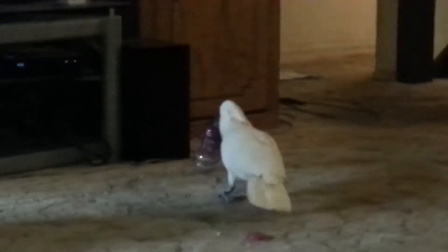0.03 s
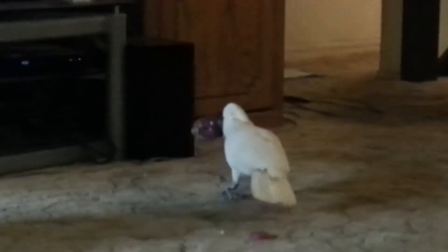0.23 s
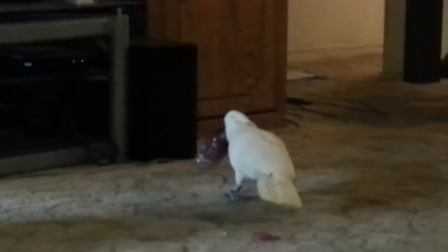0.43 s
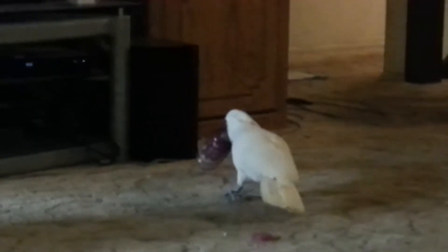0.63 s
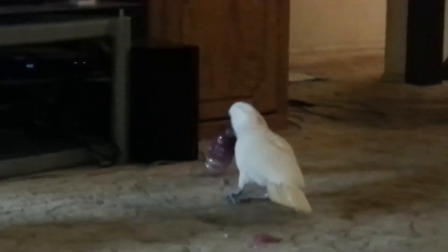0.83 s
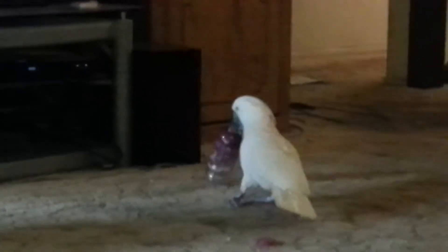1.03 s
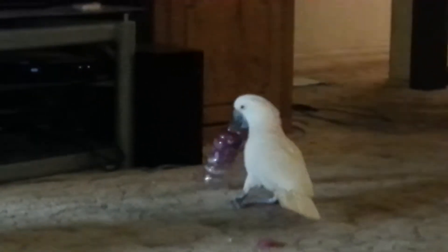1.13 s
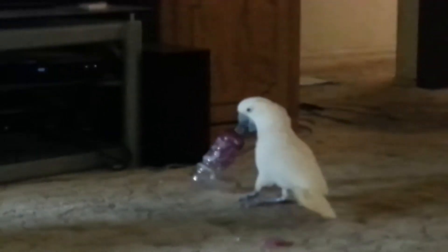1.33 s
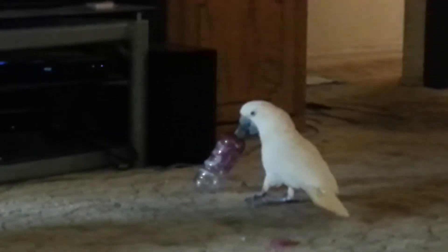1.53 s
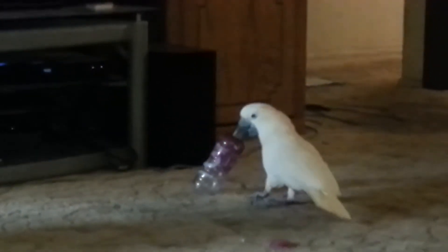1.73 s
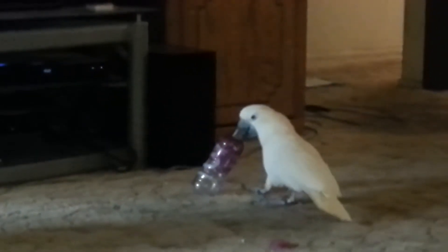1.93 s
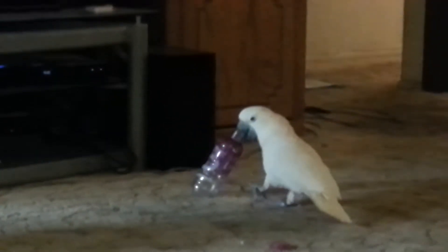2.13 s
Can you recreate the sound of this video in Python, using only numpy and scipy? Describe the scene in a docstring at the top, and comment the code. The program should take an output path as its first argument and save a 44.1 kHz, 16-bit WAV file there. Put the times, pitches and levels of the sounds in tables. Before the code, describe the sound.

Thin plastic bottle snapping and bumping hollowly on a carpeted floor, then softly scraping along.

```python
"""An empty plastic bottle, held in a cockatoo's beak a few metres away in a quiet carpeted room.
Its thin wall buckles with bright snaps, then it is knocked twice on the floor: a carpet thud, a clack
and a hollow ring from the wall and the air inside. It is dragged, rustling in tiny slips and
squeaking faintly, and tapped once more. A bed of mains hum and hiss lies underneath."""
import sys
import numpy as np
from scipy import signal
from scipy.fft import rfft, irfft, next_fast_len
from scipy.io import wavfile
from scipy.ndimage import uniform_filter1d, map_coordinates

SR = 44100
rng = np.random.default_rng(int(sys.argv[2]) if len(sys.argv) > 2 else 0)


def dump(signal):
    """Clip the signal to [-1, 1] and save it as 16-bit WAV at the path in sys.argv[1]."""
    limited = np.clip(np.atleast_2d(signal).T, -1, 1)
    pcm = np.round(limited * 32767).astype(np.int16)
    wavfile.write(sys.argv[1], SR, pcm)


N = 97020

# mains hum partials: (frequency [Hz], level [dB])
HUM_PARTIALS = [(59.8, -80), (120, -88.5), (179, -79), (240, -81.5), (539, -86.5), (720, -86.5),
                (1190, -90)]
# tone of the hiss: (frequency [Hz], gain [dB])
HISS_EQ = [(25, -14), (45, -11), (63, -14), (85, -4.5), (130, -1), (250, 0.5), (400, -9.5), (520, -1),
           (600, -13), (720, 2.5), (1000, -12.5), (1200, -8), (3100, -13.5), (7200, -14), (14500, -20.5)]
# stereo width of hiss and reverb: (frequency [Hz], left-right correlation [0-1])
STEREO_CORRELATION = [(60, 0.42), (250, 0.54), (600, 0.58), (1200, 0.083), (4000, 0.024)]
# reverb decay: (frequency [Hz], T60 [s])
REVERB_DECAY = [(200, 0.31), (1000, 0.21), (3000, 0.17), (7000, 0.18), (14000, 0.092)]
# pan of the direct sound: (frequency [Hz], left over right [dB])
DIRECT_PAN = [(250, 2), (800, 5), (1500, 6.5), (2500, 1), (5000, 11), (8500, -10), (13000, 2.5)]

# fader rides for the drag's scrape and its treble crinkle: (time [s], level [dB])
SCRAPE_ENVELOPE = [(0, -73), (.1, -70), (.17, -71.5), (.215, -58.5), (.26, -57.5), (.38, -72.5), (.52, -64),
                   (.59, -71.5), (.7, -76.5), (.8, -73), (.84, -70), (.91, -64.5), (.945, -60),
                   (1.02, -70.5), (1.06, -63), (1.14, -78.5), (1.24, -62), (1.32, -76), (1.37, -70.5),
                   (1.45, -81), (1.67, -71), (1.8, -76.5), (2.2, -75.5)]
CRINKLE_ENVELOPE = [(0, -78), (.1, -70), (.18, -76), (.22, -54.5), (.27, -58.5), (.38, -71.5), (.72, -79),
                    (.77, -63), (.8, -72), (.885, -65), (.905, -63.5), (.985, -62), (1.034, -82),
                    (1.042, -53), (1.062, -58.5), (1.1, -84), (1.16, -70), (1.18, -64.5), (1.25, -77.5),
                    (1.75, -77), (1.78, -72), (1.83, -80), (2.2, -78)]
# tone of the scrape and the crinkle: (frequency [Hz], gain [dB])
SCRAPE_EQ = [(100, -7), (250, 2), (480, -6), (900, -4), (1250, 0.5), (1550, -9.5), (2100, -3.5),
             (3200, -18), (8000, -22)]
CRINKLE_EQ = [(800, -59), (3300, -9), (4900, -3), (6000, -2), (7700, -1.5), (9500, -9.5), (14500, -7.5)]
# brief rubs: (midpoint [s], length [s], band centre [Hz], level [dB])
SCUFF_CUES = [(0.105, 0.059, 2980, -73), (0.979, 0.04, 473, -71.5), (0.987, 0.034, 7000, -61),
              (1.055, 0.038, 485, -63), (1.047, 0.025, 7600, -52.5), (1.183, 0.027, 1910, -58),
              (1.654, 0.1, 4100, -77.5), (1.78, 0.035, 7100, -73), (2.095, 0.027, 4320, -72.5)]
# faint squeaks: (time [s], length [s], start pitch [Hz], end pitch [Hz], level [dB],
# overtone slope [dB/octave], roughness [0-1])
SQUEAK_CUES = [(0.927, 0.067, 1161, 1294, -59, -15.5, 0.29), (1.231, 0.029, 1227, 1177, -59, -35, 0.33),
               (1.896, 0.018, 1296, 1314, -67, -15, 0.65), (2.053, 0.058, 357, 335, -62.5, -10, 0.21),
               (2.084, .022, 330, 313, -59.5, -7, 0.1)]

# snaps of the thin wall, the third row being an early echo of the first snap off a nearby surface: (time [s],
# level [dB], spectral peak [Hz], high cut [Hz])
SNAP_CUES = [(.2253, -28.5, 6530, 13900), (.2264, -28.5, 6730, 13200), (.2308, -30, 6250, 11900),
             (0.2792, -35.5, 7400, 9800), (0.4254, -29.5, 6840, 12400), (1.041, -54, 7500, 13900)]
# floor knocks: (time [s], air ring [dB], clack [dB], wall ring [dB], high cut [Hz], wall pitch [ratio])
KNOCK_CUES = [(0.281, -28, -29.5, -38.5, 9160, 1), (0.4263, -25, -30, -31, 11300, 1),
              (1.1787, -57.5, -46, -47.5, 2530, 0.98)]
# soft pushes into the carpet: (time [s], level [dB])
THUD_CUES = [(.270, -37.5), (.281, -30), (0.4274, -27), (1.169, -52.5)]
# tone of a snap and of a knock's clack: (frequency [Hz], gain [dB])
SNAP_EQ = [(200, -43), (1000, -29), (2200, -13), (3300, -31), (4500, -11.5), (5300, -11), (6500, 0),
           (8000, -5.5), (9800, -14.5), (14500, -21)]
CLACK_EQ = [(120, -4), (400, -0.5), (1000, -6.5), (1500, -2), (2100, 1.5), (3000, 0), (3900, -7),
            (4700, -6.5), (6600, -6.5), (8500, -14), (11000, -16), (14500, -4)]
# resonances of the air inside, the wall, the carpet thud and the ring after a snap:
# (frequency [Hz], level [dB], T60 [s], attack [s])
AIR_RING = [(255.7, 8, 0.15, 0.016), (538.5, -22.5, 0.18, 0.01)]
WALL_RING = [(812.3, -2, 0.096, 0.0023), (671, -7, .06, 0.0019), (1518, -17.5, 0.15, 0.0021),
             (1911, -12, 0.033, 0.00044), (2058, -12.5, 0.041, 0.00045), (2330, -12.5, 0.035, 0.00031)]
THUD_RING = [(195.8, -10, 0.15, 0.0046), (215.3, 1, 0.077, 0.0039), (318.6, -2.5, 0.071, .002)]
SNAP_RING = [(2160, -8, .07, 0.00078)]


def amp(db):
    """Decibels to gain."""
    return 10 ** (np.asarray(db) / 20)


def unit(x):
    """Normalise to rms 1."""
    return x / np.sqrt(np.mean(x ** 2) + 1e-20)


def along(points, hz):
    """Read a curve of (frequency [Hz], value) points on a log axis."""
    freqs, values = np.transpose(points)
    return np.interp(np.log(hz + 1), np.log(freqs + 1), values)


def clock(start=0):
    """Seconds since start, zero before it."""
    return np.maximum(np.arange(N) / SR - start, 0)


def wobble(rate):
    """A smooth random LFO with rate points a second."""
    return map_coordinates(rng.standard_normal(int(N * rate / SR) + 4), [clock() * rate])


def filtered(x, response):
    """Filter x by a complex frequency response."""
    n = x.shape[-1]
    padded = next_fast_len(n + 4096)
    return irfft(rfft(x, padded) * response(np.fft.rfftfreq(padded, 1 / SR)), padded)[..., :n]


def dulled(x, top_hz):
    """A steep high cut that sets how bright each snap or clack sounds."""
    return signal.sosfilt(signal.butter(6, min(top_hz, .45 * SR), fs=SR, output="sos"), x)


def add(track, start, sound):
    """Drop a one-shot onto the track at start seconds."""
    part = track[..., max(round(start * SR), 0):][..., :sound.shape[-1]]
    part += sound[..., :part.shape[-1]]


def burst(eq, t60, pitch=1, size=8192):
    """A noise transient, flattened and then shaped by an EQ curve; t60 is in seconds."""
    fade = 10 ** (-3 * np.arange(size) / SR / t60)
    noise = rfft(fade * rng.standard_normal(size))
    ripple = np.sqrt(np.abs(uniform_filter1d(np.abs(noise) ** 2, size=24)) + 1e-12)
    colour = amp(along(eq, np.fft.rfftfreq(size, 1 / SR) / pitch))
    # minimum phase keeps the attack sharp
    cepstrum = irfft(np.log(colour / ripple))
    cepstrum[1:size // 2] *= 2
    cepstrum[size // 2 + 1:] = 0
    hit = irfft(noise * np.exp(rfft(cepstrum)))
    return hit * np.linalg.norm(fade) / np.linalg.norm(hit)


def ring(modes):
    """Struck resonances: damped sines with a soft attack."""
    t = np.arange(SR // 2) / SR
    return sum(amp(db - 60 * t / t60) * (1 - np.exp(-t / attack)) ** 2 * np.sin(2 * np.pi * hz * t)
               for hz, db, t60, attack in modes)


def diffuse(pair):
    """Blend two unrelated noises into a field, narrower in the bass and wide on top."""
    def mid_side_gains(hz):
        angle = np.arccos(np.clip(along(STEREO_CORRELATION, hz), -1, 1)) / 2
        return np.array([np.cos(angle), np.sin(angle)])
    mid, side = filtered(pair, mid_side_gains)
    return np.array([mid + side, mid - side])


def in_room(x, wet_db, left_lag_s=.000035):
    """Direct sound, mostly louder left but a hair earlier right, plus a fresh short reverb tail."""
    x = np.pad(x, (0, SR // 4))
    hz, t, noise = signal.stft(rng.standard_normal((2, SR // 3)), SR, nperseg=256)
    decay = amp(-60 * t / along(REVERB_DECAY, hz)[:, None])
    tail = diffuse(signal.istft(noise * decay, SR, nperseg=256)[1])
    tail *= 1 - np.exp(-np.arange(tail.shape[1]) / SR / 0.0015)  # quick fade-in
    wet = signal.fftconvolve(x[None], tail / np.linalg.norm(tail[0]), axes=1)[:, :len(x)]
    sides = np.array([[.5], [-.5]])
    delay = sides * left_lag_s
    direct = filtered(x, lambda f: amp(sides * along(DIRECT_PAN, f)) * np.exp(-2j * np.pi * f * delay))
    return direct + amp(wet_db) * wet


def room_tone(hiss_db=-70, left_lead_s=.0002):
    """The bed: slightly unsteady mains hum from the left, over soft hiss."""
    t = clock() + left_lead_s * np.array([[1], [0]])
    hum = np.zeros((2, N))
    for hz, db in HUM_PARTIALS:
        level = amp(db) * np.sqrt(2) * (1 + 0.047 * wobble(4.4))
        hum += level * np.sin(2 * np.pi * hz * t + .2 * wobble(5.3))
    hiss = unit(filtered(diffuse(rng.standard_normal((2, N))), lambda hz: amp(along(HISS_EQ, hz))))
    return (hum + amp(hiss_db) * hiss) * amp([[.7], [-.7]])


def rustle(envelope, eq, slips_per_s=1500, flutter_db=3):
    """Dragged plastic moves in dense tiny slips: a granular texture under a fader ride."""
    slips = (rng.random(N) < slips_per_s / SR) * rng.standard_normal(N)
    slips *= amp(flutter_db * wobble(120))
    grains = unit(filtered(slips, lambda hz: amp(along(eq, hz))))
    return grains * amp(np.interp(clock(), *np.transpose(envelope)))


def scuffs(half_width_octaves=0.19):
    """Brief rubs of the bottle, each a band of noise that swells and fades."""
    out = np.zeros(N)
    for middle, length, hz, db in SCUFF_CUES:
        noise = rng.standard_normal(N)
        band = filtered(noise, lambda f: 1 / (1 + (np.log2((f + 1) / hz) / half_width_octaves) ** 2))
        swell = np.sin(np.pi * np.clip(clock(middle - length / 2) / length, 0, 1))
        out += amp(db) * unit(band) * swell
    return out


def squeaks():
    """The dragged bottle squeaks: short glides, roughened by jitter in pitch and level."""
    out = np.zeros(N)
    for start, length, start_hz, end_hz, db, slope_db, rough in SQUEAK_CUES:
        progress = np.clip(clock(start) / length, 0, 1)
        hz = (start_hz + (end_hz - start_hz) * progress) * (1 + 0.0588 * rough * wobble(400))
        phase = 2 * np.pi * np.cumsum(hz) / SR
        tone = sum(amp(slope_db * np.log2(k)) * np.sin(k * phase) for k in range(1, 7))
        swell = np.sqrt(np.abs(np.sin(np.pi * progress)))
        out += amp(db) * swell * tone * (1 + 0.69 * rough * wobble(200))
    return out


def snaps(eq_peak_hz=6500):
    """The thin wall buckles with short bright cracks that leave a brief ring."""
    out = np.zeros((2, N))
    for start, db, peak_hz, top_hz in SNAP_CUES:
        crack = dulled(burst(SNAP_EQ, t60=0.0089, pitch=peak_hz / eq_peak_hz), top_hz)
        add(out, start, amp(db) * in_room(crack, wet_db=-4.5))
        add(out, start, amp(db - 10.5) * in_room(ring(SNAP_RING), wet_db=-9.5))
    return out


def knocks():
    """The bottle hits the floor: ringing air and wall for body, clack for attack, thud for weight."""
    out = np.zeros((2, N))
    for start, air_db, clack_db, wall_db, top_hz, pitch in KNOCK_CUES:
        wall = ring([(hz * pitch, db, t60, attack) for hz, db, t60, attack in WALL_RING])
        add(out, start, amp(air_db) * in_room(ring(AIR_RING), wet_db=-23.5))
        add(out, start, amp(wall_db) * in_room(wall, wet_db=-9))
        clack = dulled(burst(CLACK_EQ, t60=0.0083), top_hz)
        add(out, start, amp(clack_db) * in_room(clack, wet_db=4.5))
    for start, db in THUD_CUES:
        add(out, start, amp(db) * in_room(ring(THUD_RING), wet_db=-14))
    return out


def scene():
    """The mix: knocks and snaps up front, the drag behind them, room tone underneath."""
    drag = rustle(SCRAPE_ENVELOPE, SCRAPE_EQ) + rustle(CRINKLE_ENVELOPE, CRINKLE_EQ) + scuffs()
    handling = in_room(amp(-3.5) * drag, wet_db=1) + in_room(squeaks(), wet_db=-9.5)
    return knocks() + snaps() + handling[:, :N] + room_tone()


def record(dry):
    """A brick-wall high cut on the master."""
    return filtered(dry, lambda hz: hz < 14650)


dry = scene()
out = record(dry)
dump(out)
```